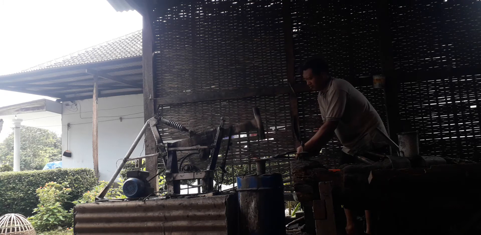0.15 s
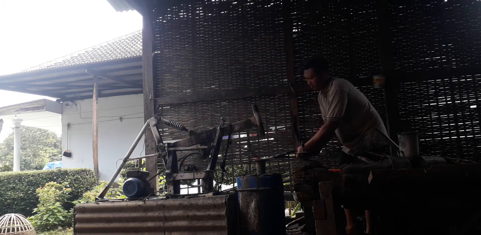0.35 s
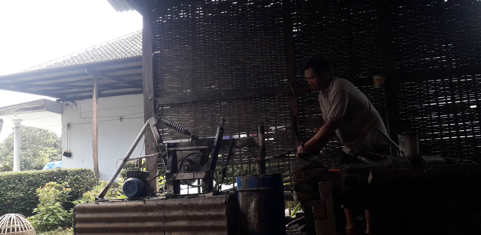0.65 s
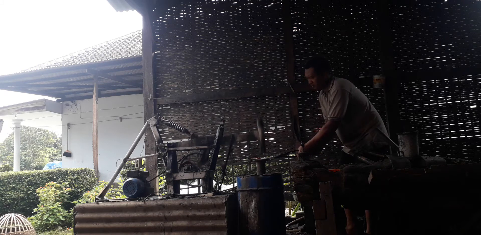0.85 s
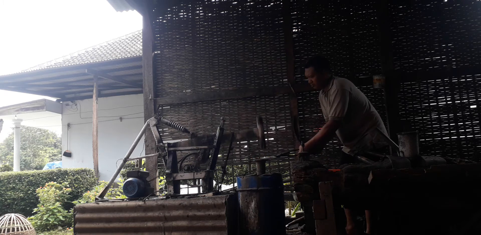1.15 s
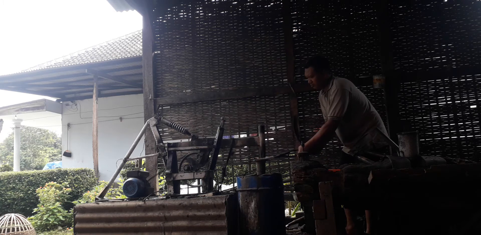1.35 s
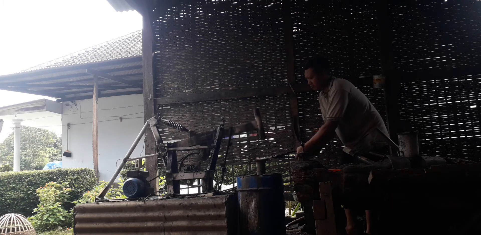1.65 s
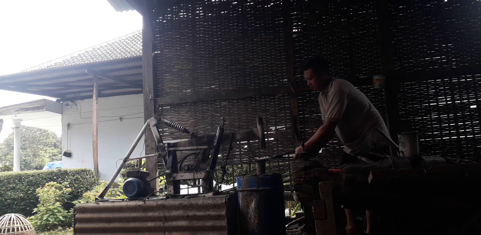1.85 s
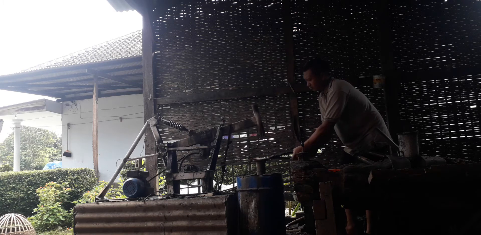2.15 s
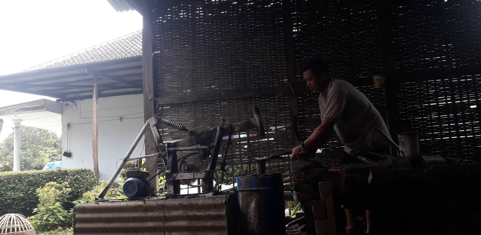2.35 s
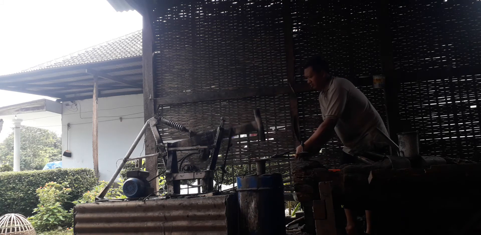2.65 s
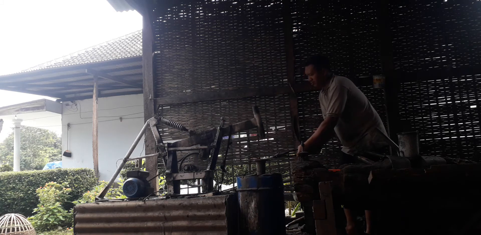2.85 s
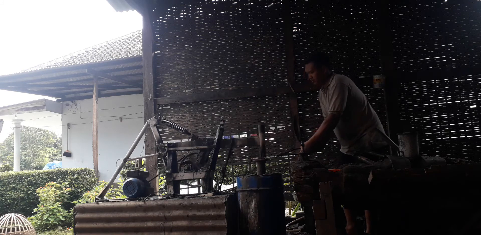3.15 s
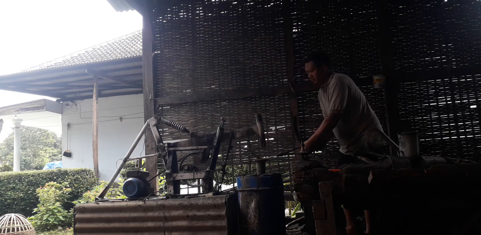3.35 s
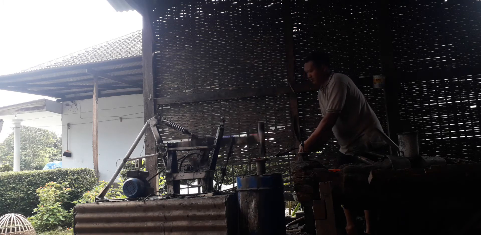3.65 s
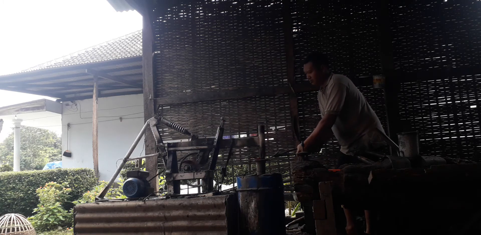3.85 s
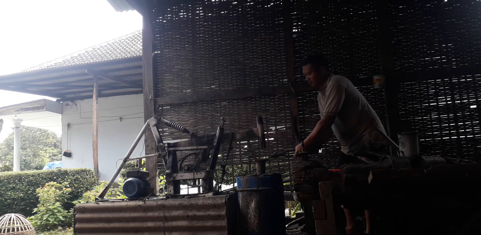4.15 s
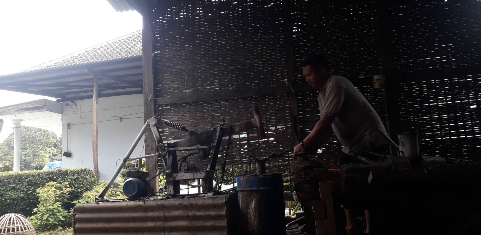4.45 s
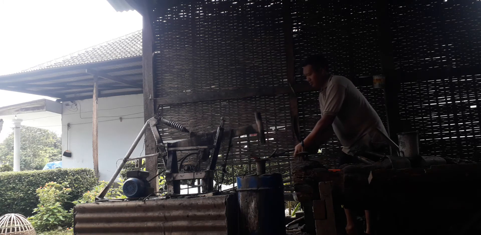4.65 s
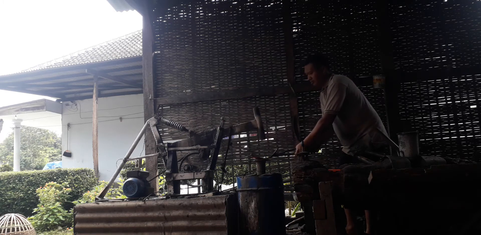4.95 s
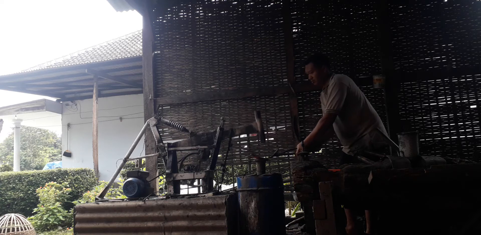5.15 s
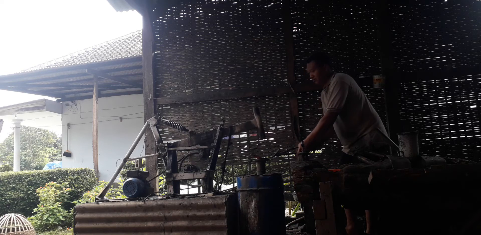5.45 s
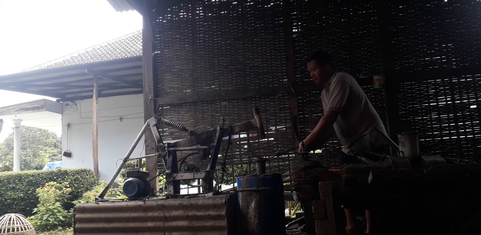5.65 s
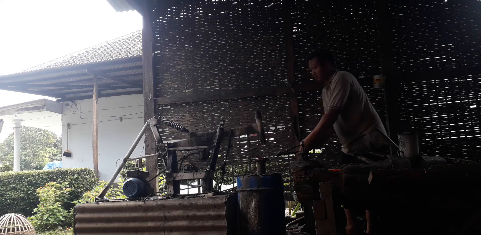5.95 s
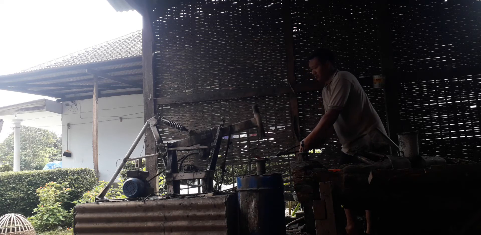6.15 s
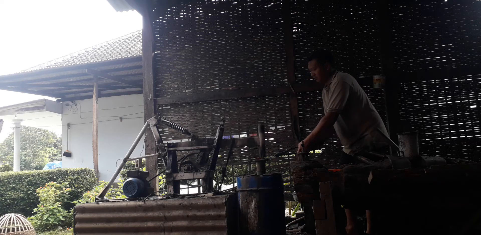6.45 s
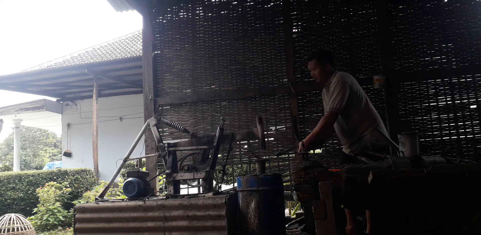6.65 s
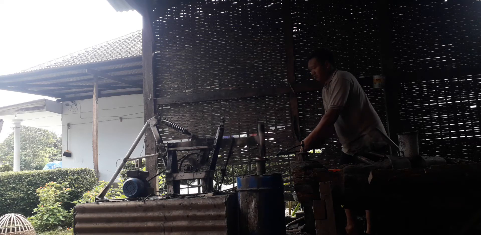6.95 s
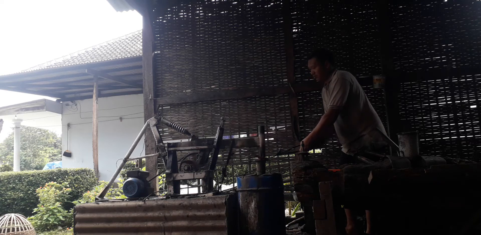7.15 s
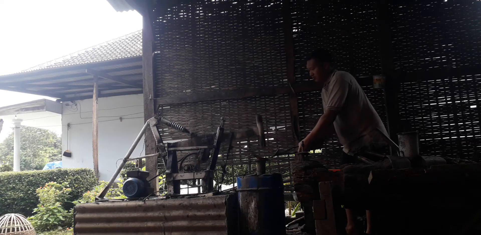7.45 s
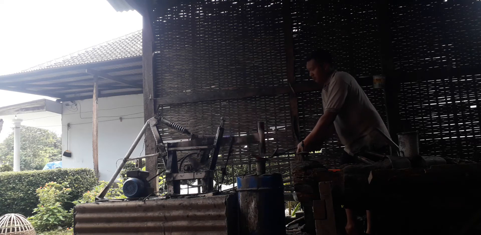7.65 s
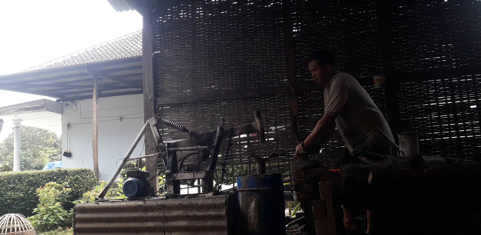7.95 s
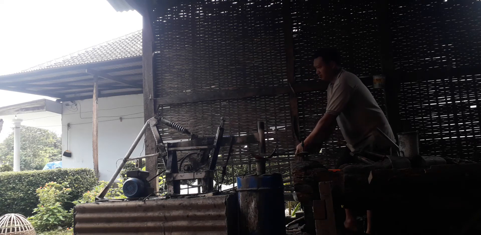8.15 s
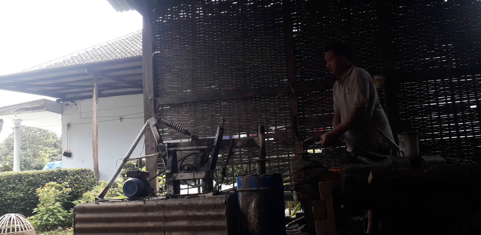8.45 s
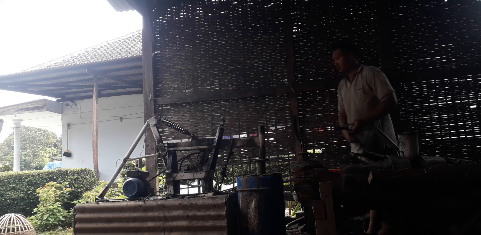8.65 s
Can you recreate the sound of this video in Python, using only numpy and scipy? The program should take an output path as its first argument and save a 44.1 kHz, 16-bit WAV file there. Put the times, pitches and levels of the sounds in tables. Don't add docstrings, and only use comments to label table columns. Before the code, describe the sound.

A motor-driven hammer crashes on iron about four times a second, metal rattling and ringing between blows, then stops with two light drops.

```python
import sys
import numpy as np
from scipy import signal
from scipy.fft import rfft, irfft
from scipy.io import wavfile
from scipy.ndimage import uniform_filter1d

SR = 44100
rng = np.random.default_rng(int(sys.argv[2]) if len(sys.argv) > 2 else 0)


def invert_db(level):
    return 10 ** (np.asarray(level, dtype=float) / 20)


def unload_wav(signal):
    wavfile.write(
        sys.argv[1],
        SR,
        np.round(np.clip(np.atleast_2d(signal).T, -1, 1) * 32767).astype(np.int16),
    )


N = 387633
BLOW_SAMPLES = 13500
TOUCH_FROM_S = 8.3


def rms_one(x):
    return x / np.sqrt(np.mean(x ** 2) + 1e-20)


def at_hz(points, hz):
    table_hz, value = np.array(points).T
    return np.interp(np.log(hz), np.log(table_hz), value)


def coloured(x, spectrum):
    hz = np.arange(N // 2 + 1) * SR / N + 1
    return rms_one(irfft(rfft(x) * invert_db(at_hz(spectrum, hz)), N))


def lay(times, shapes):
    out = np.zeros(N + shapes.shape[1])
    for s, shape in zip(times, shapes):
        i = max(round(s * SR), 0)
        out[i:i + len(shape)] += shape
    return out[:N]


def lumpy(shape, spread_db, smooth):
    wander = uniform_filter1d(rng.standard_normal(shape), size=smooth, axis=-1) * np.sqrt(smooth)
    return rms_one(rng.standard_normal(shape) * invert_db(spread_db * wander))


def resonance(x, hz, width):
    r = np.exp(-np.pi * width / SR)
    feedback = [1, -2 * r * np.cos(2 * np.pi * hz / SR), r * r]
    return signal.lfilter(np.array([1, 0, -1]) * (1 - r * r) / 2, feedback, x)


def highpass(x, order, hz):
    return signal.sosfilt(signal.butter(order, hz, "high", fs=SR, output="sos"), x)


def die(t, t60):
    return invert_db(-60 * t / t60)


def sine(hz, t):
    return np.sin(2 * np.pi * hz * t)


# pitch_hz, density_db (per Hz)
YARD_COLOUR = [(30, -37), (60, -2), (150, -10.5), (350, -2), (1000, -7), (2200, -6.5), (3700, -11),
               (8000, -18), (11000, -31), (16000, -46)]
# time_s, level_db
MOTOR_LEVEL = [
    (0, -47),
    (4, -46.5),
    (8.1, -46.5),
    (8.3, -41),
    (8.5, -56),
    (8.6, -56),
    (8.79, -52),
]


def motor():
    s, db = np.transpose(MOTOR_LEVEL)
    level = invert_db(np.interp(np.arange(N) / SR, s, db))
    return level * coloured(lumpy(N, 0.42, smooth=900), YARD_COLOUR)


# start_s, crash_db, anvil_ring_db,
# ram_clang_db, block_thump_db
MACHINE_BLOWS = [(0.016, -15, -56, -35, -43), (0.2354, -14.5, -55, -38, -29),
                 (0.4567, -15.5, -64, -11, -27), (0.677, -15, -59, -30, -38), (0.8984, -16, -58, -13, -30),
                 (1.125, -14.5, -55, -9, -39), (1.3457, -15.5, -51, -10, -28), (1.5835, -14, -55, -19, -36),
                 (1.816, -14, -51, -26, -50), (2.0489, -16.5, -63, -10, -35), (2.2815, -15, -55, -11, -39),
                 (2.5061, -14, -49, -10, -27), (2.73, -14, -48, -5, -34), (2.953, -15.5, -69, -9, -36),
                 (3.1822, -14.5, -65, -9, -32), (3.4134, -14, -67, -15, -25),
                 (3.6429, -13.5, -62, -23, -50), (3.8699, -13.5, -67, -10, -50),
                 (4.108, -12.5, -62, -10, -38), (4.3402, -14.5, -59, -13, -41),
                 (4.58, -14.5, -65, -16, -28), (4.822, -15, -52, -23, -32), (5.0622, -15.5, -47, -24, -31),
                 (5.3082, -16, -60, -32, -34),
                 (5.5577, -15, -58, -10, -32), (5.7941, -13.5, -52, -24, -50), (6.0256, -14, -51, -27, -49),
                 (6.256, -13, -49, -23, -26), (6.4818, -12, -59, -10, -34), (6.706, -14, -54, -26, -31),
                 (6.9425, -15, -54, -37, -36), (7.1708, -14.5, -51, -46, -32), (7.403, -15, -53, -15, -31),
                 (7.6345, -14, -54, -30, -43), (7.8551, -15, -47, -26, -36), (8.0893, -15.5, -57, -20, -35)]
# start_s, crash_db, anvil_ring_db, clang_db, thump_db
LIGHT_TOUCHES = [
    (8.3848, -20.5, -48, -15, -42),
    (8.618, -18, -60, -15, -56),
]
DRIVEN_BLOWS = MACHINE_BLOWS
ALL_BLOWS = DRIVEN_BLOWS + LIGHT_TOUCHES


def landing(thump_db=7.5, clang_db=-4.0, knock_db=-30, knock_spread_db=2.0, loudest_clang_db=-12):
    s, _, _, ram_db, low_db = np.transpose(ALL_BLOWS)[:, :, None]
    start, t = s[:, 0], np.arange(5000) / SR
    driven = s < TOUCH_FROM_S
    strength_db = knock_db + knock_spread_db * rng.standard_normal(s.shape)
    knock = np.minimum(t / .0025, 1) * die(t, .025) * sine(1000.0, t)
    thump = -np.minimum(t / 0.0022, 1) * die(t, 0.036) * (sine(157.0, t) + 0.65 * sine(76.0, t))
    detune = 1 + .006 * rng.standard_normal((len(s), 2))
    pair = sine(3580.0 * detune[:, :1], t) + sine(3745.0 * detune[:, 1:], t)
    short_mode = invert_db(3.0) * die(t, 0.05) * sine(3350.0 * detune[:, :1], t)
    clang = np.minimum(t / 0.0018, 1) * (die(t, 0.097) * pair + short_mode)
    knocks = lay(start - .003, driven * invert_db(strength_db) * knock)
    thumps = lay(start + 0.0023, invert_db(low_db + thump_db) * thump)
    clangs = lay(start + 0.001213, invert_db(np.minimum(ram_db + clang_db, loudest_clang_db)) * clang)
    return knocks + thumps + clangs


def contact(level_db=-8.0, t60=.005):
    s, db = np.transpose(ALL_BLOWS)[:2, :, None]
    t = np.arange(400) / SR
    crack = np.diff(rng.standard_normal((len(s), len(t) + 1)))
    return lay(s[:, 0], invert_db(db + level_db) * die(t, t60) * crack)


# pitch_hz, density_db (per Hz)
CRASH_COLOUR = [(28, -55), (48, -14), (335, -3), (450, -11), (800, -2), (1200, -2), (1900, -6.5),
                (2300, -10), (3650, -2), (4300, -4.5), (8800, -9), (9700, -14.5), (10900, -17),
                (12000, -14), (15500, -18.5)]
# pitch_hz, factor (ratio)
DECAY_FACTOR = [(50, 1.93), (200, 0.95), (600, 1.306), (1500, 1.038), (4000, 0.95), (8000, 0.9),
                (14000, 0.68)]
# pitch_hz, width_hz, gain_db
MODE_CLUSTERS = [(364, 91, 5.5), (1088, 13, 4.5), (1523, 100, 2.5), (1934, 193, 5), (2454, 11, 7),
                 (2896, 34, 5), (3520, 110, 2.5), (3670, 78, 3.5), (4590, 14, 8.5), (5940, 400, 1.5),
                 (7240, 54, 3), (8500, 100, 4), (11900, 220, 5)]
# pitch_hz, share (0-1)
INSTANT_SHARE = [(300, 0.85), (3000, 0), (7000, 0.06), (14000, 0.04)]
# pitch_hz, share (0-1)
ALIKE_SHARE = [(60, 0.98), (500, 0.41), (2000, 0.06), (16000, 0.42)]


def crash_tones(s, crash_db, touch):
    harder_db = crash_db + 14.5
    thins_db = -23 * (s - 8.5)
    luck_db = 0.44 * rng.standard_normal((len(s), 3))
    thud_db = np.where(touch, -7 + thins_db, -3 - 0.49 * s)
    body_db = np.where(touch, -4.5 + .45 * thins_db, -0.54 - 0.38 * harder_db)
    edge_db = np.where(touch, -1.5, 0.78 + 0.1 * harder_db)
    return np.hstack([thud_db, body_db, edge_db]) + luck_db


def crash(rise_s=0.0046, low_rise_cycles=0.42, first_db=10.0, first_s=0.0035, touch_db=2.0, touch_s=0.0088):
    s, crash_db = np.transpose(ALL_BLOWS)[:2, :, None]
    t = np.arange(BLOW_SAMPLES) / SR
    touch = s > TOUCH_FROM_S
    fresh = lumpy((2, len(s), BLOW_SAMPLES), 1.54, smooth=60)
    alike = rng.standard_normal((2, BLOW_SAMPLES))
    colour = invert_db(at_hz(CRASH_COLOUR, np.arange(BLOW_SAMPLES // 2 + 1) * SR / BLOW_SAMPLES + 1))
    fresh, alike = irfft(rfft(fresh) * colour), irfft(rfft(alike) * colour)
    stroke_s = np.minimum(np.diff(s, axis=0, append=[[N / SR]]), .28)
    t60 = np.where(touch, .25, 0.29 + 1.12 * (stroke_s - .23))
    tones = crash_tones(s, crash_db, touch)
    parts_db = .6 * rng.standard_normal((len(s), 30))
    head_db = first_db * np.exp(-t / first_s) + touch * touch_db * (np.exp(-t / touch_s) - .5)
    edges, out = 40 * 2 ** np.arange(0, 9.1, 1 / 3), 0
    for k, (low, high) in enumerate(zip(edges, edges[1:])):
        hz = np.sqrt(low * high)
        share = np.clip(at_hz(ALIKE_SHARE, hz), 0, 1)
        white = np.sqrt(share) * alike[k % 2] + np.sqrt(1 - share) * fresh[k % 2]
        tone_db = [at_hz([(300, thud), (1000, body), (3500, 0), (10000, edge)], hz)
                   for thud, body, edge in tones]
        late = (1 - at_hz(INSTANT_SHARE, hz)) * np.exp(-t / (rise_s + low_rise_cycles / hz))
        swell = np.minimum(t * 2000, 1) * (1 - late)
        fall = die(t, t60 * at_hz(DECAY_FACTOR, hz)) * invert_db(head_db)
        gain = invert_db(crash_db + np.array(tone_db)[:, None] + parts_db[:, k:k + 1])
        sos = signal.butter(2, [low, high], "band", fs=SR, output="sos")
        out = out + signal.sosfilt(sos, white * swell) * fall * gain
    out = lay(s[:, 0], out * invert_db(17.5))
    return out + sum(resonance(out, hz, width) * (invert_db(db) - 1) for hz, width, db in MODE_CLUSTERS)


# pitch_hz, level_db, t60_s
BAR_MODES = [(329, -39, .3), (690, -44, .45), (770, -40, .3), (1048, -35, .25), (1614, -39, .3),
             (1829, -37, .2), (1949, -36, .2), (2486, -40, .2), (2902, -36, .22), (3340, -37, .2),
             (3576, -35, .22), (3744, -34, .22), (3940, -37, .2), (4530, -39, .36), (4655, -36, .22),
             (6205, -41, .3), (7580, -44, .33), (10850, -60, .35)]


def bars(spread_db=5.0):
    s, crash_db = np.transpose(DRIVEN_BLOWS)[:2]
    t = np.arange(BLOW_SAMPLES) / SR
    chance = rng.standard_normal((len(s), len(BAR_MODES), 2))
    out = 0
    for k, (hz, db, t60) in enumerate(BAR_MODES):
        pitch = hz * (1 + 0.003 * chance[:, k, :1])
        size = invert_db(db + crash_db[:, None] + 22 + spread_db * chance[:, k, 1:])
        out = out + size * die(t, t60) * sine(pitch, t)
    return lay(s + 0.002099, out)


def anvil(t60=.9, lift_db=9.5, twin_hz=45.0, twin=.45):
    s, _, db = np.transpose(ALL_BLOWS)[:3, :, None]
    touch = s > TOUCH_FROM_S
    hz = np.where(touch, 10008, 9942) + 14 * rng.standard_normal(s.shape)
    t = np.arange(BLOW_SAMPLES) / SR
    free = t < np.diff(s, axis=0, append=[[s[-1, 0] + 1]])
    tone = sine(hz, t) + twin * (s < TOUCH_FROM_S) * sine(hz + twin_hz, t)
    rise = np.minimum(t / np.where(touch, .04, .015), 1)
    return lay(s[:, 0], free * invert_db(db + lift_db) * die(t, t60) * rise * tone)


# centre_s, level_db
SPRING_SLAPS = [(0.125, -39), (0.357, -47), (0.558, -40), (0.784, -43), (1.009, -40), (1.248, -42),
                (1.489, -39), (1.728, -43), (1.959, -39), (2.18, -36), (2.403, -42), (2.857, -39),
                (3.091, -43), (3.543, -39), (3.785, -38), (4.012, -39), (4.254, -40), (4.662, -34),
                (4.916, -34), (5.22, -44), (5.467, -42), (5.938, -44), (6.169, -38.5), (6.379, -39),
                (6.636, -47), (6.804, -33), (7.074, -42), (7.255, -37), (7.487, -35), (7.717, -45)]
# pitch_hz, density_db (per Hz)
SPRING_COLOUR = [(500, 3.5), (1500, -22), (3500, 10), (6200, 4), (8000, 9.5), (10000, -0.5), (12500, 1),
                 (16000, -0.5)]


def jingle(lift_db=-1.5, fall=0.95, width_s=0.029):
    t, knocks = np.arange(N) / SR, lumpy(N, 3.0, smooth=24)
    high, low = np.zeros(N), np.zeros(N)
    for s, db in SPRING_SLAPS:
        part = slice(round((s - .08) * SR), round((s + .14) * SR))
        d = (t[part] - s) / width_s
        swell = invert_db(db + lift_db) * np.where(d < 0, np.exp(-d * d), np.exp(-d / fall))
        high[part] += swell
        low[part] += swell * invert_db(0.6 - 0.7 * (db + 44))
    grains = coloured(knocks, SPRING_COLOUR) * invert_db(8.5)
    grains = grains + 2.5 * resonance(grains, 6210.0, 90.0) + 1.5 * resonance(grains, 7600.0, 90.0)
    bright = highpass(grains, 2, 7000)
    return high * bright + low * (grains - bright)


# start_s, peak_db
LINK_KNOCKS = [(0.32, -22), (2.3675, -29.5), (2.598, -24), (3.285, -23.5), (3.577, -37), (4.2129, -19),
               (4.236, -27), (5.15, -25), (5.4958, -40), (5.998, -36), (6.807, -20.5), (6.86, -32),
               (7.04, -23), (7.27, -24), (7.3678, -35), (8.28, -40)]
# pitch_hz, level_db, t60_s
LINK_MODES = [(3600, -2, .07), (5500, -6, .1), (6230, 0, .1), (7590, -7, .12), (8600, -8, .05),
              (11900, -10, .04)]


def link(spread_db=0.5, snap_db=-9.0, lift_db=-2.5, chatter_hz=75.0):
    s, db = np.transpose(LINK_KNOCKS)[:, :, None]
    t = np.arange(6000) / SR
    chance = rng.standard_normal((len(s), len(LINK_MODES)))
    noise = rng.standard_normal((len(s), len(t) + 1))
    out = invert_db(snap_db) * (die(t, 0.012) + invert_db(-11) * die(t, 0.14)) * np.diff(noise)
    for k, (hz, mode_db, t60) in enumerate(LINK_MODES):
        chatter = rms_one(resonance(noise[:, 1:], hz, chatter_hz))
        out = out + invert_db(mode_db + spread_db * chance[:, k:k + 1]) * die(t, t60) * chatter
    return lay(s[:, 0], invert_db(db + lift_db) * np.minimum(t / 0.0013, 1) * out)


# start_s, peak_db, pitch_hz, snap_db (relative to the peak)
LOOSE_PARTS = [(0.347, -33, 7560, 6), (3.5325, -33, 7400, -4), (4.004, -34, 8100, 1),
               (4.1746, -45, 8400, -10), (4.479, -36.5, 7250, 9), (4.619, -23, 8600, -6),
               (4.906, -28, 8260, -4), (5.3556, -33, 7040, 4), (5.627, -32, 8500, 11),
               (5.7067, -44.5, 10900, 15), (6.0518, -16, 3920, 5), (6.5634, -32, 3680, -4),
               (6.7407, -26, 11800, -13), (7.7528, -44, 9000, -11), (7.891, -20, 5600, -8),
               (7.9328, -33, 12200, -10), (8.0202, -41, 7660, 0), (8.1538, -38, 3970, -9),
               (8.2, -26, 7150, -14), (8.214, -37, 11900, 18), (8.28, -27.5, 3640, -7),
               (8.285, -33, 5600, -6), (8.3239, -32.5, 6000, 2), (8.6977, -30, 3730, -13)]


def ticks(lift_db=-2.0, snap_t60=.02, ring_t60=.03, tail_db=-8.0, tail_t60=.2):
    s, db, hz, snap_db = np.transpose(LOOSE_PARTS)[:, :, None]
    t = np.arange(5000) / SR
    noise = highpass(rng.standard_normal((len(s), len(t))), 2, 1800)
    tail = invert_db(tail_db) * die(t, tail_t60)
    snap = invert_db(snap_db) * noise * (die(t, snap_t60) + tail)
    narrow = np.array([rms_one(resonance(n, f, 300.0)) for n, f in zip(noise, hz[:, 0])])
    ring = (1.36 * narrow + 0.41 * sine(hz, t)) * (die(t, ring_t60) + tail)
    return lay(s[:, 0], invert_db(db + lift_db) * np.minimum(t / 0.00051, 1) * (snap + ring))


def scene():
    blows = landing() + contact() + crash() + bars() + anvil()
    return (motor() + blows + jingle() + link() + ticks())[None]


def top_cut(x):
    return signal.sosfilt(signal.butter(12, 16990, fs=SR, output="sos"), x)


def record(dry):
    top = 1.1
    heard = highpass(top * np.tanh(dry / top), 3, 42.0)
    mix = signal.sosfilt(signal.ellip(8, .5, 30, 15700, fs=SR, output="sos"), heard)
    return top_cut(mix)


dry = scene()
out = record(dry)
unload_wav(out)
```